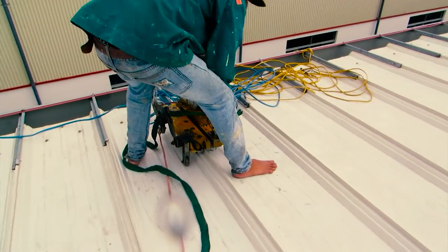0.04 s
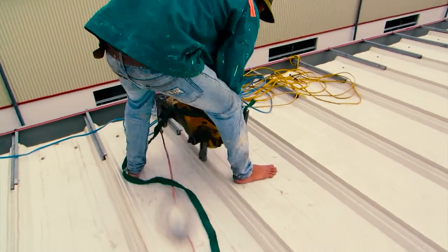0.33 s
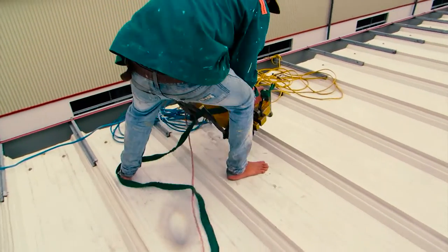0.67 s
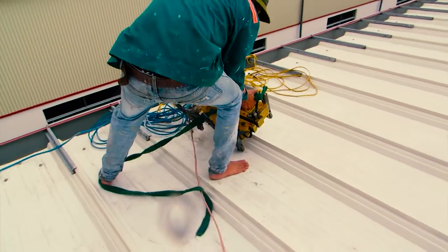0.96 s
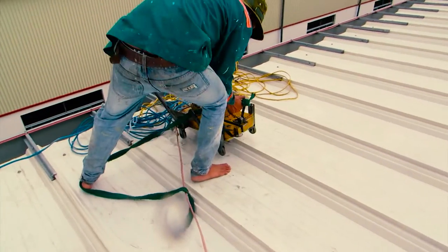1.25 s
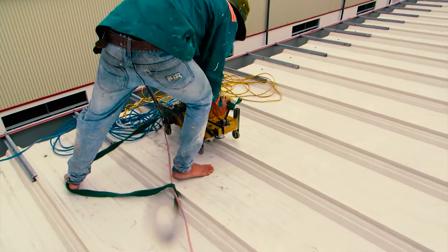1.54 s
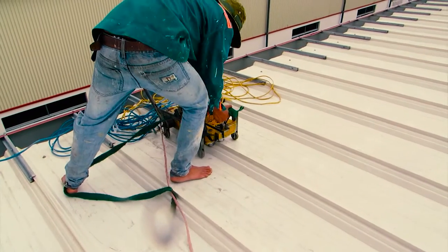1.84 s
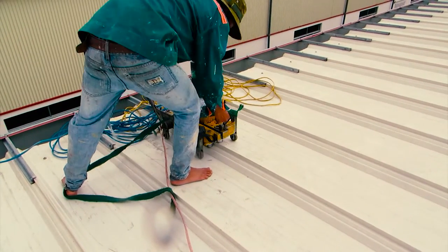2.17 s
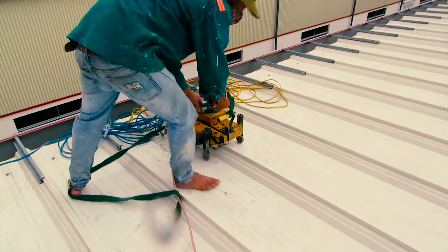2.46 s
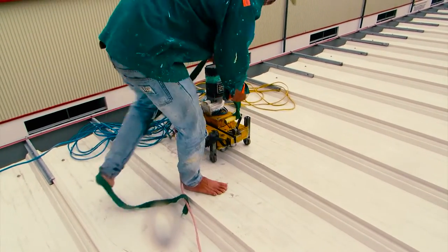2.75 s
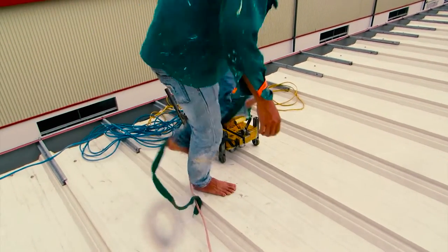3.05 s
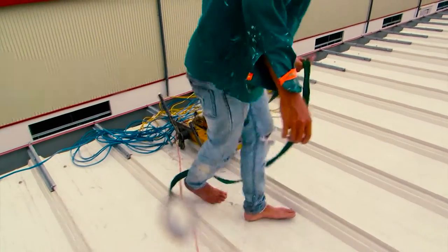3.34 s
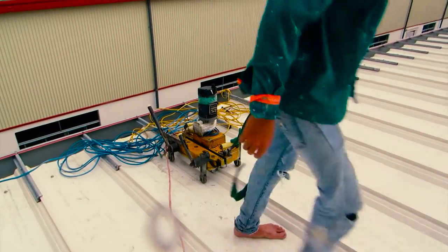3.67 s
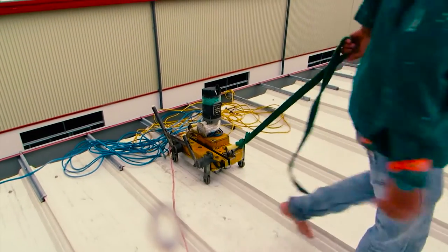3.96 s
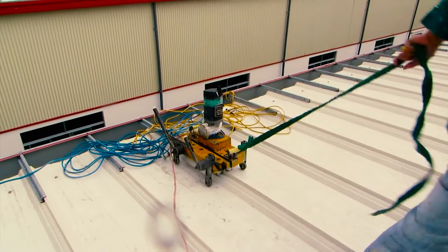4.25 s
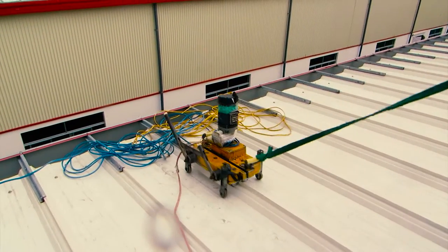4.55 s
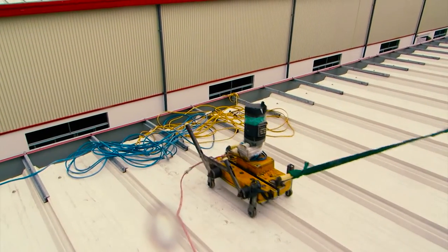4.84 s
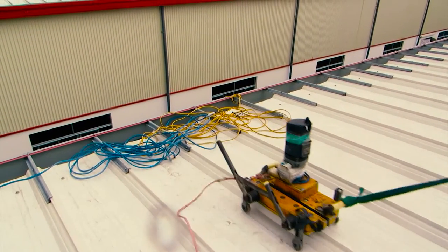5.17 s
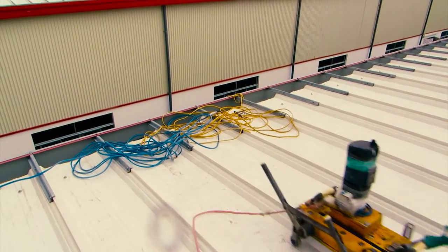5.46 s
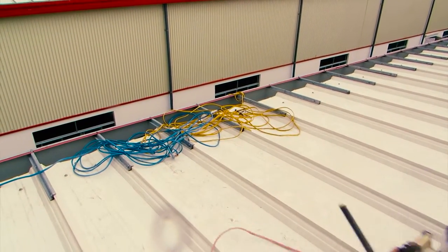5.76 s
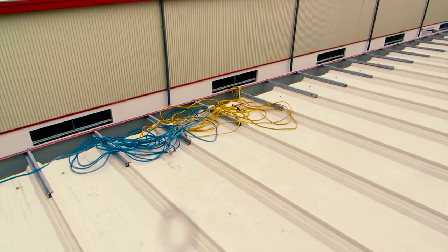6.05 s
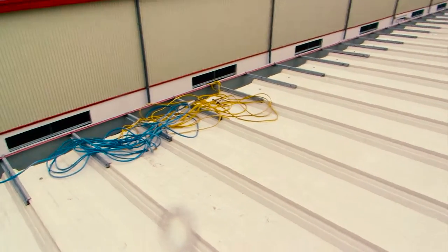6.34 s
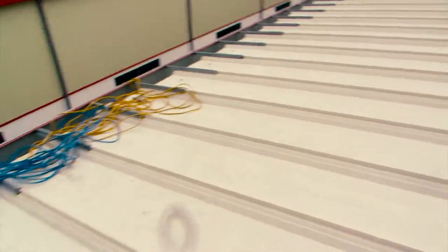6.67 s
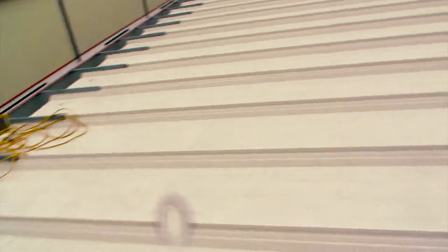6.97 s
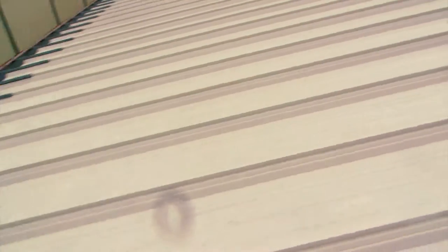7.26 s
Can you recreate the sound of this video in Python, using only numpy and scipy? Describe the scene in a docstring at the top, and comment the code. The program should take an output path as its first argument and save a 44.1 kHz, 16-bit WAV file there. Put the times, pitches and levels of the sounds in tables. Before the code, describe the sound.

A small steel machine is set down on a sheet-metal roof, its parts clanking and jingling while the panels thud hollowly. After a few dry clicks and soft footfalls, it is towed close past the microphone, wheels rumbling over bumps and frame rattling. Outdoors, gusts buffet the microphone on and off, over a faint hush and a thin electrical whine.

```python
"""Seaming machine on a metal roof

A seaming machine is set down on a sheet-metal roof: its steel parts clank and jingle, the panels thud.
Then a strap tows it past the microphone; its wheels rumble over small bumps and its frame rattles.
Gusts buffet the microphone pair throughout, over a faint outdoor hush and a thin electrical whine."""
import sys
import numpy as np
from scipy import signal
from scipy.fft import rfft, irfft, next_fast_len
from scipy.io import wavfile
from scipy.ndimage import uniform_filter1d, minimum_filter1d, map_coordinates

SR = 44100
rng = np.random.default_rng(int(sys.argv[2]) if len(sys.argv) > 2 else 0)


def dump_mix(stems):
    """Bounce the given channels to the path in sys.argv[1] as a 16-bit WAV at rate SR."""
    frames = np.atleast_2d(stems).T  # one column per channel
    limited = np.clip(frames, -1, 1)  # hard clip at full scale
    pcm = np.round(limited * 32767).astype(np.int16)
    wavfile.write(sys.argv[1], SR, pcm)


N = 331191
TIME = np.arange(N) / SR
LEAD = SR // 200  # samples of room ahead of each burst

# the dull tone of a blow on the roof: pitch_hz, level_db
THUD_SPECTRUM = [(40, -21), (110, 3), (340, -2.5), (650, -2), (1000, -6), (1600, -11.5), (6000, -65)]
# the bright edge of a blow on steel: pitch_hz, level_db
TREBLE_SPECTRUM = [(3500, -31), (6500, 13), (8500, 8), (11000, 1.5), (13500, 1), (16000, -22)]


def gain_of(db):
    """Turns decibels into a factor to multiply by."""
    return 10 ** (np.asarray(db) / 20)


def evened(x):
    """Scales a signal to an average (rms) size of 1."""
    return x / np.sqrt(np.mean(x ** 2) + 1e-20)


def over_pitch(points, hz):
    """Reads a table between its rows, with octaves evenly spaced."""
    row_hz, value = np.transpose(points)
    return np.interp(np.log(hz + 1e-6), np.log(row_hz), value)


def over_time(points):
    """Joins (time, value) points with straight lines, one value a sample."""
    return np.interp(TIME, *np.transpose(points))


def add(mix, start_s, sound):
    """Mixes a sound in at start_s."""
    part = mix[max(round(start_s * SR), 0):][:len(sound)]
    part += sound[:len(part)]


def colour(x, spectrum):
    """Filters x by (pitch_hz, level_db) points and evens its size."""
    size = next_fast_len(len(x))
    gain = gain_of(over_pitch(spectrum, np.fft.rfftfreq(size, 1 / SR)))
    return evened(irfft(rfft(x, size) * gain, size)[:len(x)])


def noise(spectrum, size=N):
    """Steady noise with the given spectrum."""
    return colour(rng.standard_normal(size), spectrum)


def wander(rate_hz):
    """A smooth random drift of average size 1."""
    knots = rng.standard_normal(N // 20)
    return evened(map_coordinates(knots, [TIME * rate_hz], order=2, mode="wrap"))


def grains(per_s, spread_db):
    """Tiny impacts at random times, a few of them large."""
    size = gain_of(spread_db * np.minimum(rng.exponential(1, N), 4.5))
    return size * rng.choice([-1, 1], N) * (rng.random(N) < per_s / SR)


def blow(spectrum, t60, tail_db=-120, tail_s=.2, rise_s=0.000067, hold_s=0, spike=0):
    """A noise burst that holds, then fades 60 dB in t60 seconds; it may have a spike and a weak tail."""
    t = np.arange(SR // 3) / SR
    fading_s = np.maximum(t - hold_s, 0)
    decay = gain_of(-60 * fading_s / t60) + gain_of(tail_db - 60 * fading_s / tail_s)
    envelope = decay * (1 - np.exp(-t / rise_s))
    burst = np.pad(envelope * rng.standard_normal(len(t)) + spike * (t == 0), (LEAD, 0))
    return colour(burst, spectrum) * np.sqrt((np.sum(envelope ** 2) + spike ** 2) / len(burst))


def strike(mix, start_s, db, burst):
    """Mixes in a burst so that its attack falls at start_s."""
    add(mix, start_s - LEAD / SR, gain_of(db) * burst)


def ring_metal(impacts, spectrum, t60):
    """Each impact rings the many close tones of sheet metal."""
    return evened(signal.oaconvolve(impacts, blow(spectrum, t60))[:N])


def microphone_pair(x):
    """Sound reaches the two microphones with a different level and timing, most of all in the bass."""
    # how much louder the left is: pitch_hz, difference_db
    balance = [(50, 6.9), (120, 7.9), (270, 9.7), (650, 6.2), (1500, 4.9), (3500, 2.6), (8000, 2.9),
               (15000, 3.3)]
    # how far the right is ahead: pitch_hz, phase_radians
    phase = [(50, 3), (130, 2.8), (300, 2.5), (650, 2), (1200, 1.45), (2500, .9), (5000, .6), (14000, .4)]
    size = next_fast_len(N + 4096)
    hz = np.fft.rfftfreq(size, 1 / SR)
    left_to_right = gain_of(-over_pitch(balance, hz)) * np.exp(1j * over_pitch(phase, hz))
    left = rfft(x, size) * 2 / abs(1 + left_to_right)
    return irfft(np.array([left, left * left_to_right]), size)[:, :N]


def echo(x):
    """Roof ribs and a wall scatter a short, thin echo to each side."""
    t = np.arange(SR // 3) / SR
    spectrum = [(60, -42), (300, 5.0), (3000, 17.5), (12000, 6.5)]
    envelope = gain_of(-60 * t / .22) * (t > .006)
    tails = np.array([noise(spectrum, size=len(t)) for side in range(2)]) * envelope
    return signal.oaconvolve(x[None], tails / np.linalg.norm(tails[0]), axes=1)[:, :N]


def outdoor_hush():
    """A faint, low wash of outdoor noise, only partly alike on the two sides."""
    # its tone: pitch_hz, level_db
    spectrum = [(30, 18.5), (100, 9), (350, 2), (800, 1), (1600, -4), (3200, -8.5), (6000, -15.5),
                (9000, -23.5), (13000, -34), (16000, -77)]
    # its rise and fall: time_s, level_db
    levels = [(0, -50), (1, -45.5), (2, -43.5), (2.4, -53.5), (2.8, -51.5), (3.6, -48.5), (4.3, -45.5),
              (7.5, -44.5)]
    shared = microphone_pair(noise(spectrum))
    separate = np.array([noise(spectrum), noise(spectrum)])
    return gain_of(over_time(levels)) * (shared + gain_of(-1) * separate)


def whine():
    """Three thin electrical tones waver in strength, mostly on the right."""
    # the main tone: time_s, level_db
    main_levels = [(0, -63), (.9, -61), (1.6, -65.5), (2.8, -67), (4.4, -59.5), (5.4, -55.5), (6.2, -60),
                   (7, -71), (7.5, -64)]
    # two weaker tones: pitch_hz
    pair_hz = [5953, 6065]
    # they swell and fade together: time_s, level_db
    pair_levels = [(0, -71.5), (.55, -68.5), (1.5, -71), (2.45, -69.5), (3, -76.5), (3.6, -66.5),
                   (3.95, -66), (4.2, -74), (6, -68.5)]
    out = np.zeros(N)
    for hz, levels in [(7866, main_levels)] + [(hz, pair_levels) for hz in pair_hz]:
        strength = np.sqrt(2) * gain_of(over_time(levels) + 0.4 * wander(rate_hz=3.9))
        out += strength * np.sin(2 * np.pi * (hz * TIME + rng.random()))
    return out * gain_of([[-7], [3.5]])


def wind_level():
    """Wind strength in dB: each gust rises, holds and dies away over the breeze."""
    # the breeze between gusts: time_s, level_db
    breeze = [(0, -36), (.55, -50), (1.5, -35), (3.2, -42), (4.35, -54), (4.75, -31), (5.8, -29),
              (6.4, -19.5), (7.5, -23)]
    # gusts at the microphone: start_s, length_s, level_db
    gusts = [(0.059, 0.25, -25), (0.361, 0.11, -30), (0.586, 0.34, -20), (0.702, 0.16, -20),
             (0.925, 0.16, -15), (1.121, 0.26, -19), (1.389, 0.18, -24), (1.641, 0.58, -21),
             (2.151, 0.3, -15.5), (2.45, .11, -19), (2.642, 0.053, -19), (2.792, 0.064, -25.5),
             (2.868, 0.073, -28), (2.998, 0.063, -30), (3.45, .13, -25), (3.659, 0.087, -24),
             (3.749, 0.088, -29), (3.913, 0.23, -31.5), (6.736, .1, -14), (6.943, .16, -17.5),
             (7.294, 0.2, -19)]
    rise_s, fall_s = .03, .025
    power = gain_of(over_time(breeze)) ** 2
    for start_s, length_s, db in gusts:
        rise = np.clip((TIME - start_s) / rise_s, 0, 1)
        fall = np.exp(-np.maximum(TIME - start_s - length_s, 0) / fall_s)
        power += (gain_of(db) * rise * fall) ** 2
    return 10 * np.log10(power)


def wind():
    """Swirls of air push the two microphones in opposite ways; faster air is louder and higher."""
    # the tone of the swirls: multiple_of_swirl_rate, level_db
    swirl_shape = [(.03, -19), (.25, -1.5), (.6, 2), (1, -1), (1.5, -14.5), (2.2, -18.5), (4, -46),
                   (8, -66), (20, -82)]
    # the tone of big, slow swirls: pitch_hz, level_db
    sway_spectrum = [(15, 17.5), (40, -1), (70, 8), (140, -29), (400, -58)]
    # single hard buffets: time_s, level_db, width_ms
    buffets = [(2.084, 6.5, 0.76), (2.211, 0.5, 0.41), (2.263, 7, 0.42), (2.286, 4.5, 0.46),
               (2.316, 7, 0.46), (6.834, 3, 0.63), (7.346, 5, 1.4)]
    level_db = wind_level() + 1.495 * wander(rate_hz=18)
    extra_db = level_db + 20  # above a typical gust
    swirl_hz = 286 * 2 ** (extra_db / 25)  # an octave higher for every 25 dB
    flurry = wander(rate_hz=170)
    # noise made for one swirl rate is played faster or slower as the air speed changes
    base_hz = 400
    spectrum = [(multiple * base_hz, db) for multiple, db in swirl_shape]
    position = np.cumsum(swirl_hz * gain_of(1.2 * flurry)) / base_hz
    strength = gain_of(level_db + 1.7 * flurry - 0.3)
    opposed, shared = (strength * map_coordinates(noise(spectrum), [position], order=3, mode="wrap")
                       for part in range(2))
    opposed += gain_of(-24 + 0.37 * extra_db) * noise(sway_spectrum)
    shared *= gain_of(-14.5)
    t = np.arange(-SR // 50, SR // 50) / SR
    for time_s, db, width_ms in buffets:
        widths = 1000 * t / width_ms
        pulse = gain_of(db - 6) * (1 - widths ** 2) / (1 + widths ** 2 / 3) ** 3  # one swirl passing
        add(opposed, time_s + t[0], pulse)
        add(shared, time_s + t[0], gain_of(-13.5) * pulse)
    return np.array([gain_of(.25) * opposed, -gain_of(-.25) * opposed]) + shared


def snaps():
    """Handling the machine and its strap makes short, dry clicks with a faint tail."""
    # each click: start_s, level_db, pitch_hz
    clicks = [(0.22, -27, 1590), (0.37, -33.5, 910), (2.786, -32, 2451), (2.88, -38, 980),
              (3.194, -21, 2440), (3.2177, -31.5, 2760), (3.254, -35.5, 2944), (3.389, -30.5, 1720),
              (3.461, -27.5, 3100)]
    out = np.zeros(N)
    for start_s, db, hz in clicks:
        spectrum = [(hz * 0.17, -24), (hz * 0.29, -6), (hz, 0), (hz * 2.9, -8), (hz * 3.17, -22),
                    (hz * 6, -38), (hz * 12, -65)]
        click = blow(spectrum, t60=0.0083, tail_db=-24, tail_s=0.044, rise_s=.0001, spike=3.5)
        strike(out, start_s, db + 1, click)
    return out


def ticks():
    """Small parts of the frame knock and ring very briefly."""
    # each knock: start_s, level_db, pitch_hz
    knocks = [(1.001, -30, 2120), (1.208, -30, 3731), (1.263, -22, 3700), (1.667, -24, 3700),
              (4.776, -31, 3200), (4.851, -36.5, 2923), (4.881, -32.5, 3310), (5.026, -28, 3270),
              (5.168, -30, 3350), (5.286, -30, 2870), (5.331, -33, 2970), (5.349, -21, 3900),
              (5.425, -32, 3500), (5.468, -28.5, 4200), (5.522, -31, 4630), (5.907, -27.5, 1980),
              (7.30, -30.5, 2300), (7.378, -30, 3200)]
    out = np.zeros(N)
    for start_s, db, hz in knocks:
        spectrum = [(hz * 0.1, -20), (hz * 0.6, -8), (hz * 0.8, -9), (hz, 0), (hz * 1.19, -8),
                    (hz * 1.53, -13), (hz * 4, -40)]
        strike(out, start_s, db + 3.5, blow(spectrum, t60=0.022, rise_s=0.0004))
    return out


def thuds():
    """The roof sheet gives under the machine and bare feet, and answers with a hollow thud."""
    # each flex of the sheet: start_s, level_db, fade_s, pitch_hz
    flexes = [(0.221, -33.5, 0.35, 720), (1.148, -22.5, 0.15, 500), (1.267, -33.5, 0.5, 597),
              (1.444, -34, 0.19, 660.7), (1.660, -26, 0.13, 492), (1.804, -35, 0.2, 347),
              (1.809, -25, 0.31, 162), (1.672, -19.5, 0.088, 258), (2.076, -24, 0.087, 375),
              (2.258, -22, 0.1, 560), (2.663, -25.5, 0.087, 536), (3.435, -34.5, 0.21, 58.4),
              (3.639, -29.5, 0.15, 58), (3.915, -26.5, 0.14, 68), (4.039, -31, 0.11, 50),
              (4.404, -34, 0.3, 1020), (5.02, -28, 0.16, 55), (5.313, -25, 0.22, 61),
              (5.976, -20.5, 0.27, 147)]
    out = np.zeros(N)
    for start_s, db, fade_s, hz in flexes:
        spectrum = [(hz * 0.25, -16), (hz * 0.5, -6), (hz, 0), (hz * 1.31, -5), (hz * 2.08, -12),
                    (hz * 4, -30), (hz * 12, -65)]
        strike(out, start_s, db + .5, blow(spectrum, fade_s, rise_s=0.0025))
    return out


def panel_ring(lowest_hz, hold_s=0):
    """A roof panel rings while a weight presses on it, then dies away."""
    # its hollow tones: multiple_of_lowest, level_db, fade_s
    tones = [(1, -2, 0.067), (1.183, -10.5, 0.043), (1.431, -9.5, 0.15), (1.642, -13.5, 0.09),
             (1.804, -13, 0.073)]
    t = np.arange(SR // 4) / SR
    multiple, db, fade_s = np.transpose(tones)[:, :, None]
    envelope = gain_of(db - 60 * np.maximum(t - hold_s, 0) / fade_s)
    ring = envelope * np.sin(2 * np.pi * (lowest_hz * multiple * t + rng.random(fade_s.shape)))
    return ring.sum(0) * (1 - np.exp(-t / 0.00047))


def heavy_bumps():
    """The machine's weight or a jolting wheel knocks a panel; each spot has its own pitch."""
    # each bump: start_s, level_db, press_s, lowest_pitch_hz
    bumps = [(1.148, -19.5, 0.019, 490), (1.267, -20.5, 0.0042, 481), (1.668, -25, 0.0058, 309),
             (1.804, -13, 0.002, 338.5), (5.365, -19, 0.0036, 491), (5.505, -22, 0.02, 490),
             (5.543, -21, 0.0027, 379), (5.672, -19, 0.011, 480), (5.798, -20.5, 0.0035, 483),
             (5.912, -22, .003, 436), (6.006, -22.5, 0.017, 466), (6.343, -21.5, 0.0024, 534),
             (6.399, -18.5, 0.0025, 418.7), (6.618, -21, 0.0044, 351.3), (7.299, -24.5, .002, 513.7)]
    out = np.zeros(N)
    for start_s, db, press_s, hz in bumps:
        add(out, start_s, gain_of(db) * panel_ring(hz, press_s))
        strike(out, start_s, db - 3, blow(THUD_SPECTRUM, t60=.03))
    return out


def small_bumps():
    """The wheels keep knocking new spots of the sheet into short, hollow rings."""
    per_s, low_hz, high_hz = 45, 190, 640
    out = np.zeros(N)
    for k, (delay, spot, force) in enumerate(rng.random((round(per_s * N / SR), 3))):
        ring = panel_ring(low_hz * (high_hz / low_hz) ** spot)
        add(out, (k + 2 * delay) / per_s, gain_of(10 * force) * ring)
    return evened(out)


def towing_levels():
    """Rumble, rattle and drumming (in dB) grow as the strap pulls harder and the machine comes closer."""
    # how hard the strap pulls: time_s, effort_db
    pull = [(4.3, -22), (4.53, -14.5), (4.6, -4.5), (4.98, -4.5), (5.4, 1), (5.85, 1.5), (6.12, 0),
            (6.35, 2), (6.78, 2), (6.9, -2.5), (7.2, 0.5), (7.51, 4.5)]
    pass_s, nearest_m, speed_m_per_s = 5.85, 1, 1.18
    pull_db = over_time(pull)
    distance_m = np.hypot(nearest_m, speed_m_per_s * (TIME - pass_s))
    near_db = 20 * np.log10(nearest_m / distance_m)
    behind = .5 + .5 * np.tanh((TIME - 5.57) / 0.41)  # the rattle is weaker behind the microphone
    on_panel = np.exp(-((TIME - 6.04) / 0.2) ** 2)  # one panel drums most as the wheels cross it
    rumble_db = near_db + pull_db - 25.57
    rattle_db = near_db + 1.37 * pull_db - 38.9 - 7 * behind
    drum_db = near_db + pull_db - 43 + 14 * on_panel
    return rumble_db, rattle_db, drum_db


def panel_drum():
    """A shaken roof panel drums at its own low pitches."""
    # those pitches: pitch_hz, width_hz, level_db
    tones = [(120.6, 8.3, 8.5), (135, 20, -4)]
    hz = np.fft.rfftfreq(N, 1 / SR)
    response = sum(gain_of(db) / (1 + 2j * (hz - pitch) / width) ** 2 for pitch, width, db in tones)
    return evened(irfft(rfft(rng.standard_normal(N)) * response, N))


def rolling():
    """Steel wheels jolt over the roof: the sheet rumbles, the frame rattles and clinks, grit cracks."""
    # the tone of the rumbling sheet: pitch_hz, level_db
    rumble_spectrum = [(40, -17), (75, -9.5), (115, -3.5), (150, -2.5), (200, 1), (280, 1), (410, -10.5),
                       (550, -5), (780, -7), (1000, -12), (1350, -17), (1600, -15.5), (2600, -27),
                       (6000, -66)]
    # the tone of the rattling frame: pitch_hz, level_db
    frame_spectrum = [(900, -25), (1800, -2), (2600, -1), (4400, -1), (6000, -6), (8000, -13), (10500, -20),
                      (13000, -27), (16000, -50)]
    crack_spectrum = [(800, -18), (2500, 0), (7000, 5), (13000, -13), (16000, -45)]
    rumble_db, rattle_db, drum_db = towing_levels()
    moving = np.clip((TIME - 4.3) / 0.062, 0, 1)
    shake = wander(rate_hz=42)
    sheet, frame, clinks = np.zeros((3, N))
    for spot in range(10):  # each spot rings in its own way
        jolts = grains(per_s=130, spread_db=2.5)
        sheet += ring_metal(jolts, rumble_spectrum, t60=0.12)
        frame += ring_metal(jolts * abs(jolts) ** 0.16, frame_spectrum, t60=0.068)
        hz = rng.uniform(2200, 4600)
        spectrum = [(hz * .4, -17), (hz * .8, -9), (hz, 0), (hz * 1.25, -9), (9000, -22), (16000, -50)]
        clinks += ring_metal(grains(per_s=5, spread_db=1.5), spectrum, t60=.028)
    drum = panel_drum()
    cracks = ring_metal(grains(per_s=19, spread_db=1.5), crack_spectrum, t60=0.021)
    rattle = evened(frame) + gain_of(-4.5) * evened(clinks) + gain_of(-13.5) * cracks
    rumble = evened(sheet) + gain_of(-7) * small_bumps()
    return moving * (gain_of(rumble_db + 0.85 * shake) * rumble
                     + gain_of(rattle_db + 1.4 * shake) * rattle
                     + gain_of(drum_db) * drum)


def jingles():
    """Loose steel fittings bounce; each bounce lands on a new spot and brings out other tones."""
    # each jingle: start_s, level_db, centre_pitch_hz
    hits = [(0.984, -47, 7500), (1.03, -38.5, 5200), (1.078, -34.5, 4530), (1.137, -38, 6900),
            (1.231, -27.5, 5502), (1.755, -35, 8420), (1.844, -28, 4410), (1.860, -25, 6400),
            (2.794, -34, 9600)]
    # the tones of the fittings: pitch_hz, level_db, fade_s
    tones = [(4130, -4, .06), (4320, 1, 0.058), (4530, 6, 0.065), (5600, 10, 0.055), (5600, 4, .04),
             (6160, 0, .05), (6700, -2, 0.029), (8250, 4, 0.036), (9230, -1, 0.045), (10660, -3, 0.066),
             (10785, -9, 0.094), (11400, -3, 0.054), (12250, -7, .045)]
    out, t = np.zeros(N), np.arange(SR // 4) / SR
    hz, tone_db, fade_s = np.transpose(tones)[:, :, None]
    for start_s, db, centre_hz in hits:
        detune = 1 + .025 * rng.standard_normal(hz.shape)
        for bounce in range(4):
            spot_db = 4.5 * rng.standard_normal(hz.shape)
            weight = gain_of(tone_db - 7.2 * np.log2(hz / centre_hz) ** 2 + spot_db)
            waves = np.sin(2 * np.pi * (hz * detune * t + rng.random(hz.shape)))
            ring = (weight * gain_of(-60 * t / fade_s) * waves).sum(0) / np.linalg.norm(weight)
            ring *= 1 - np.exp(-t / 0.00024)
            land_s = start_s + .005 * (bounce + .8 * rng.random()) * (bounce > 0)
            add(out, land_s, gain_of(db - 0.5 - 4.4 * bounce) * ring)
            strike(out, land_s, db - 17 - 3.4 * bounce, blow(TREBLE_SPECTRUM, t60=0.0088))
    return out


def clanks():
    """Steel knocks on steel: a hard crack and a short rattle, with the roof thudding beneath."""
    # each knock: start_s, level_db, thud_boost_db, treble_boost_db, chatter_s
    knocks = [(0.084, -28.5, 12.5, -1, 0.00047), (0.177, -35.5, 10, 1, 0.0022),
              (0.219, -28.5, 8.5, -15, 0.00094), (0.368, -40, 22, -30, 0.00071),
              (0.887, -26.5, 10, -21, .001), (0.976, -25.5, 13.5, -22, 0.00098),
              (0.984, -27, -13, -2.5, 0.012), (1.048, -36, 13.5, 0, .001), (1.079, -33.5, 1, -4, .001),
              (1.136, -21, -14, 1, 0.0012), (1.207, -19, 9, -25, 0.0018), (1.226, -29, 16, -17, 0.016),
              (1.262, -18.5, 3, -27, 0.0019), (1.665, -16.5, 9.5, -32, 0.0017), (1.7, -28, 16.5, -7, .001),
              (1.719, -14, 5, -15, 0.0015), (1.746, -22.5, -4, -9, 0.0066), (1.758, -20.5, 11, -3, .004),
              (1.768, -17.5, 6, -9, 0.0018), (1.8005, -10.5, 10.5, -5, 0.0013),
              (1.8056, -10, 7.5, -4.5, 0.0016), (1.861, -27, 8.5, -9, 0.01),
              (1.894, -30.5, 17.5, -10, .002), (1.96, -30.5, 14, -23, 0.00088),
              (1.979, -27, 3.5, -19, 0.0018), (2.609, -37.5, -16, -5, 0.0009),
              (2.784, -38, -27, -10, 0.011), (4.418, -21, -24, -8.5, 0.0017),
              (4.57, -18, -1, -12.5, 0.00079), (4.657, -20.5, -6, -17, 0.0014),
              (5.144, -18.5, 8.5, -21, 0.0019), (5.349, -19, -6, -12, .004),
              (5.497, -24.5, 12, -9.5, 0.018), (5.643, -23.5, 17, -2.5, 0.0011),
              (5.771, -30, -3, -2, 0.0012), (6.125, -29, -7, -5, .001), (6.745, -30, 13, -28, 0.026)]
    # the tone of the crack: pitch_hz, level_db
    spectrum = [(400, 16.5), (1000, 8.5), (1700, 10), (2700, 11), (4200, 7.5), (6500, 1), (9000, -22),
                (16000, -72)]
    out = np.zeros(N)
    for start_s, db, thud_db, treble_db, chatter_s in knocks:
        steel = blow(spectrum, t60=.04, tail_db=-20.5, tail_s=.17, rise_s=.0009, hold_s=chatter_s,
                     spike=4)
        treble = blow(TREBLE_SPECTRUM, t60=.035, tail_db=-26, tail_s=.14, rise_s=.001, hold_s=chatter_s)
        thud = blow(THUD_SPECTRUM, t60=0.15, rise_s=0.0035, hold_s=chatter_s)
        strike(out, start_s, db - 6.5, steel)
        strike(out, start_s, db + treble_db - 8.5, treble)
        strike(out, start_s, db + thud_db - 15.5, thud)
    return out


def scene():
    """The machine and its echo, with the outdoor hush, the wind and the whine."""
    machine = clanks() + thuds() + heavy_bumps() + jingles() + snaps() + ticks() + rolling()
    return outdoor_hush() + microphone_pair(machine) + gain_of(-13) * echo(machine) + wind() + whine()


def record(dry):
    """A limiter turns down the strongest peaks and recovers slowly; the highest treble is cut off."""
    ceiling_db, recovery_db_per_s, cutoff_hz = -0.15, 14, 15900
    peak_db = 20 * np.log10(abs(dry).max(0) + 1e-6)
    recovery_db = TIME * recovery_db_per_s
    held_db = np.maximum.accumulate(peak_db + recovery_db) - recovery_db
    over_db = np.maximum(held_db - ceiling_db, 0)
    smooth_gain = gain_of(uniform_filter1d(minimum_filter1d(-over_db, size=61), size=61))
    treble_cut = signal.firwin(511, cutoff_hz, window=("kaiser", 9), fs=SR)
    return signal.oaconvolve(dry * smooth_gain, treble_cut[None], "same")


dry = scene()
out = record(dry)
dump_mix(out)
```